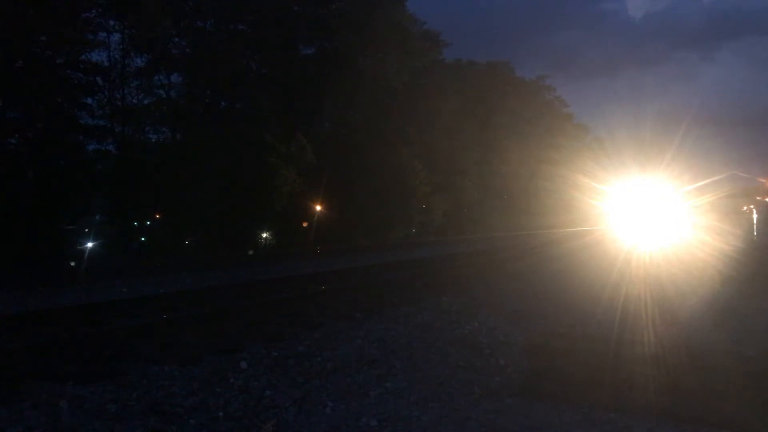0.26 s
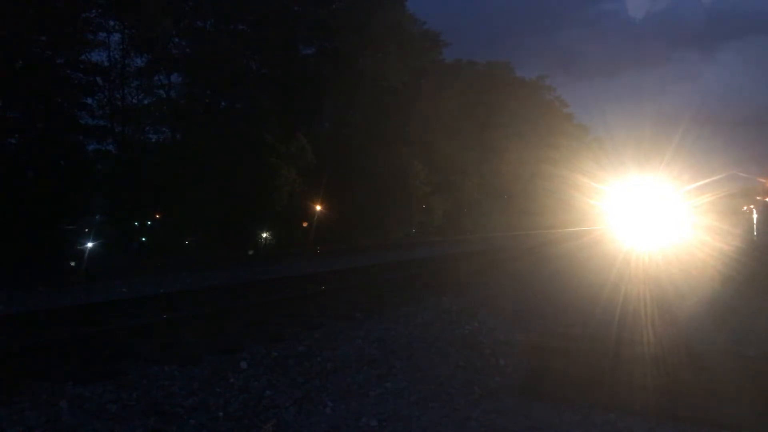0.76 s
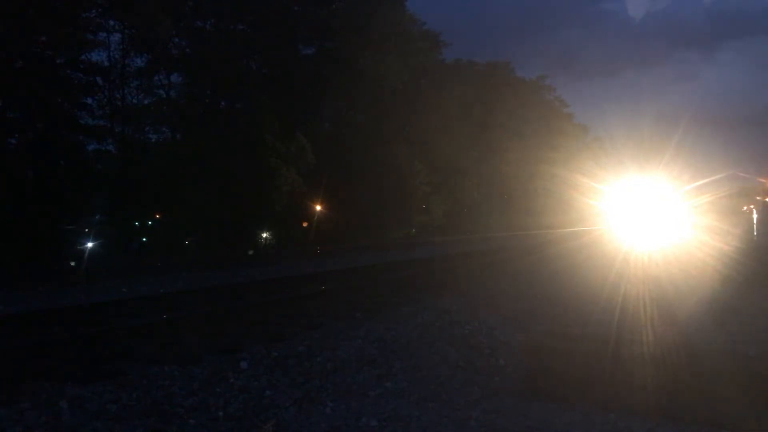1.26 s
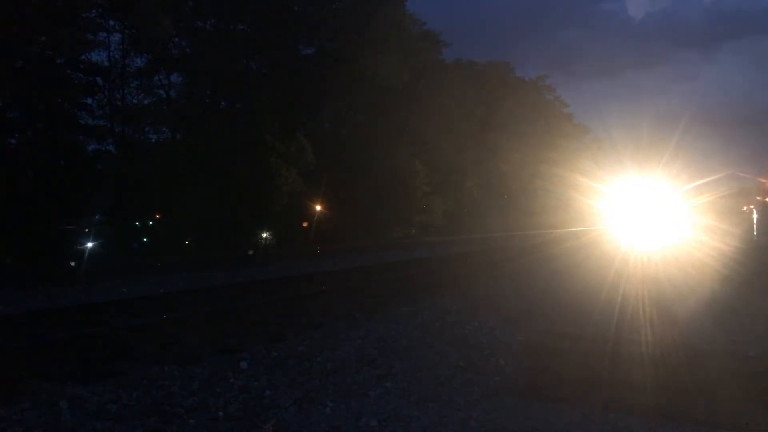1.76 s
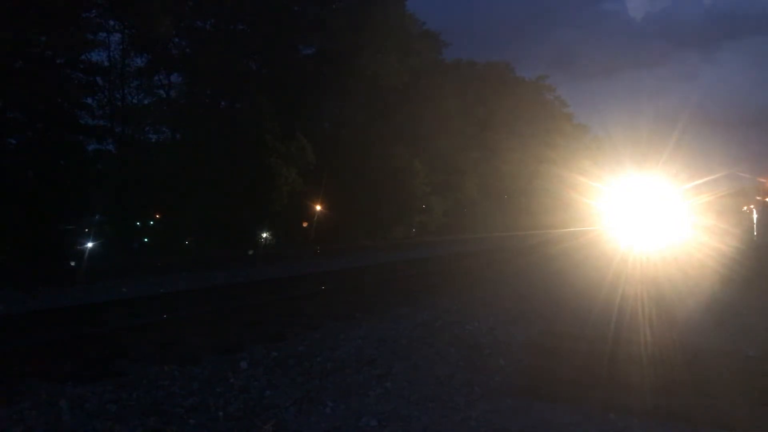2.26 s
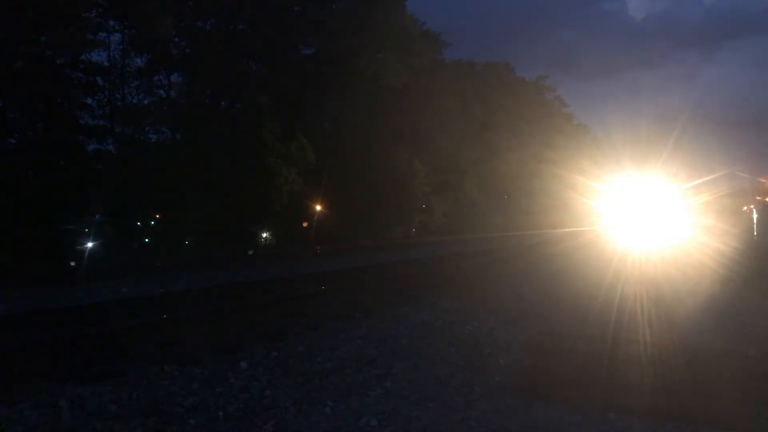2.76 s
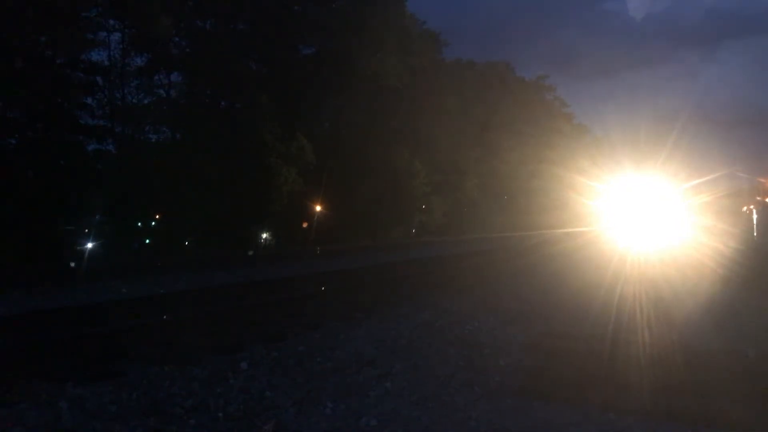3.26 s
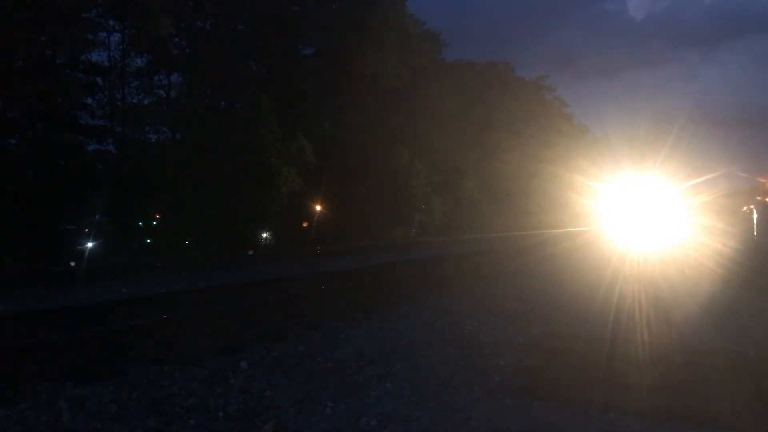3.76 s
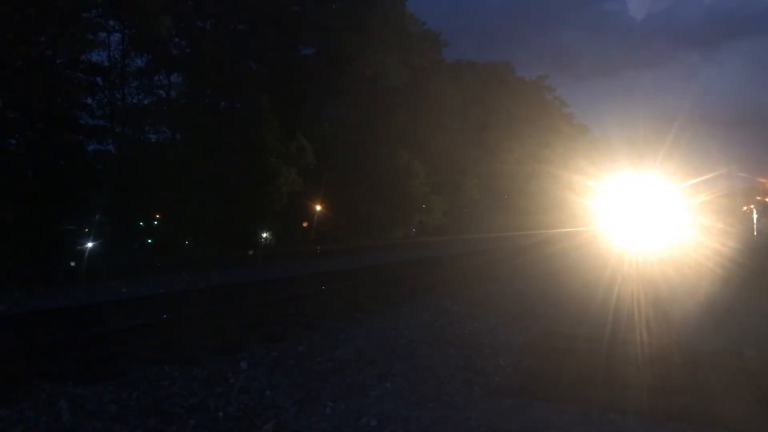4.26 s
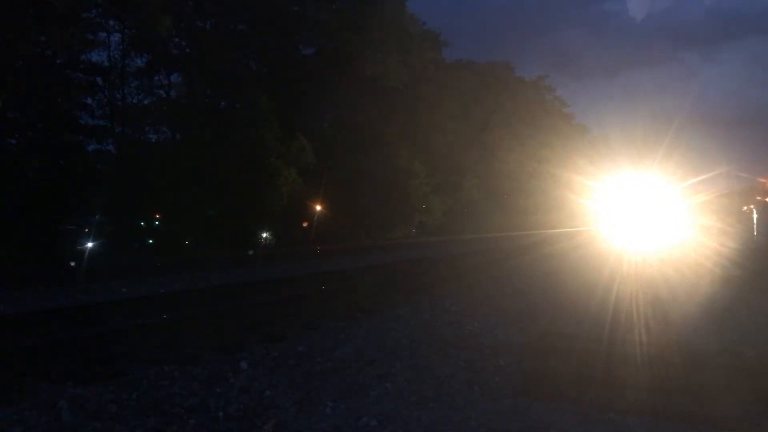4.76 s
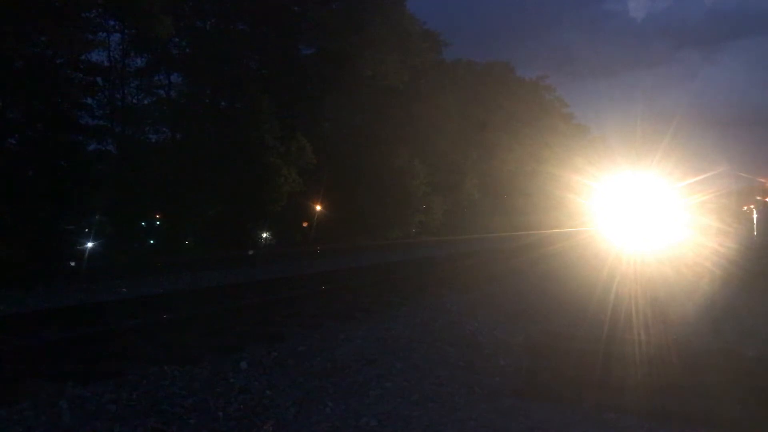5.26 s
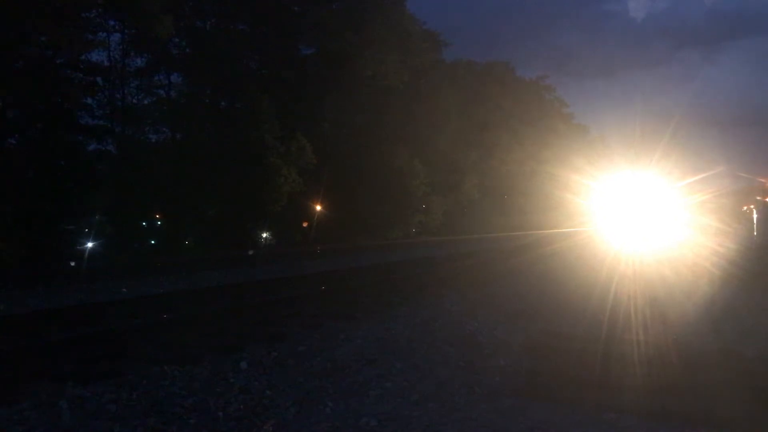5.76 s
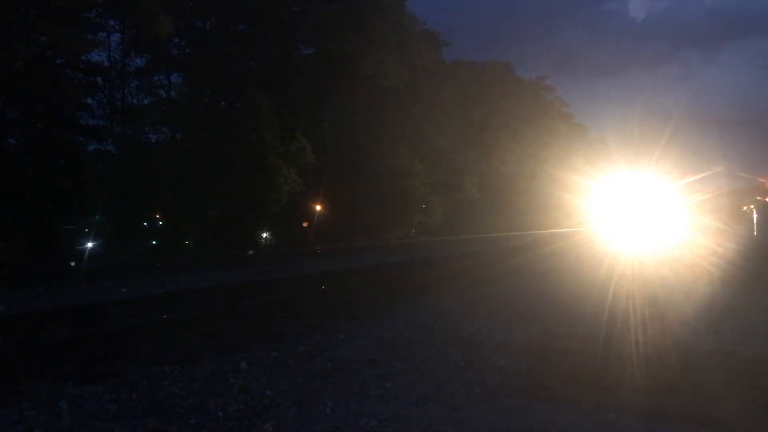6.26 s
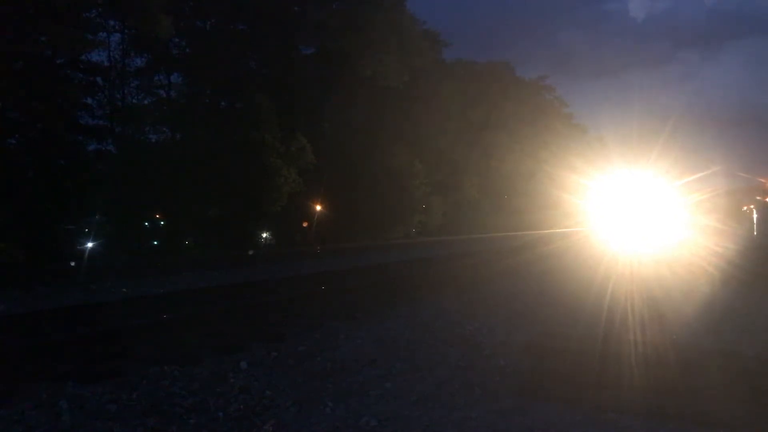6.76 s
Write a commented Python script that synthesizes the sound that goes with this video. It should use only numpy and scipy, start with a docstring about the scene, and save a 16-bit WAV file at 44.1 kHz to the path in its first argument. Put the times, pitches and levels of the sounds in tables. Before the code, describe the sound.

From 0 to 7 seconds a distant diesel locomotive approaches slowly along a line at dusk, its engine holding one low speed. Deep humming tones around 60 and 90 hertz waver over a soft bass rumble, with a smooth, quieter rush of fans and wheels and muted throbbing resonances. A slightly higher engine hum grows very gradually; there is no horn and no passing. Faint insects chirr high in the trees, swelling slightly now and then, most at about 2.4 to 2.9. Close, dull knocks on the microphone mount begin at 2.0, bunch at 2.2 to 2.4 and again at 2.9 to 3.3. A sharp, dry click snaps at 4.2, gravel crunches briefly at 4.6, and a weak tick comes at 5.2. A faint, falling moan swells around 5.3. More thumps land at 5.6, 5.8 and 6.3, with a tiny tick at 6.0. The drone continues to the end.

```python
"""Diesel locomotive at dusk

A locomotive creeps closer from far off, its engine at a steady low speed: tones at multiples of the shaft
speed drone over filtered-noise rumble, fan and wheel rush, hood resonances and two sinking, blurred tones.
Knocks ring the microphone's mount in decaying sines; clicks are filtered snaps, crunches short noise swells.
Insects in the trees are chirping noise bands that swell now and then, under a thin, high buzz."""
import sys
import numpy as np
from scipy import signal
from scipy.fft import rfft, irfft
from scipy.io import wavfile
from scipy.ndimage import uniform_filter1d

SR = 44100
rng = np.random.default_rng(int(sys.argv[2]) if len(sys.argv) > 2 else 0)


def inscribe(sig):
    """Save sig as 16-bit PCM at rate SR to the path in sys.argv[1].

    A 1-D sig is mono; a 2-D sig holds one channel per row.
    Samples are clipped to [-1, 1] before scaling.
    """
    pcm = np.round(np.clip(np.atleast_2d(sig).T, -1, 1) * 32767)
    wavfile.write(sys.argv[1], SR, pcm.astype(np.int16))


N = 308700
T = np.arange(N) / SR


def undb(db):
    """Decibels to gain."""
    return 10 ** (np.asarray(db) / 20)


def level(x, db):
    """Scale to an rms level."""
    return x * undb(db) / np.sqrt(np.mean(x ** 2))


def curves(rows):
    """The columns of a time table, interpolated to one value per sample."""
    s, *columns = np.transpose(rows)
    return [np.interp(T, s, column) for column in columns]


def walk(rate_hz):
    """Smooth random wandering with a spread near 1: twice-averaged random steps."""
    step_n = int(SR / rate_hz)
    steps = np.repeat(rng.standard_normal(N // step_n + 1), step_n)
    smooth = uniform_filter1d(uniform_filter1d(steps, step_n), step_n)
    return 1.47 * smooth[:N]


def shaped(x, points):
    """Filter a sound by (Hz, dB) points, joined on a log frequency axis."""
    hz, db = np.transpose(points)
    bins_hz = np.maximum(np.arange(N // 2 + 1) * SR / N, 1)
    gain = undb(np.interp(np.log(bins_hz), np.log(hz), db))
    return irfft(rfft(x) * gain, N)


def coloured(points):
    """Noise of rms 1 with a spectrum of (Hz, dB) points."""
    return level(shaped(rng.standard_normal(N), points), 0)


def resonate(x, hz, width_hz):
    """A two-pole resonance with gain 1 at its centre."""
    return signal.lfilter(*signal.iirpeak(hz, hz / width_hz, fs=SR), x)


def band(hz, width_hz):
    """Noise of rms 1 through two equal resonances in series, for steep sides."""
    once = resonate(rng.standard_normal(N), hz, width_hz)
    return level(resonate(once, hz, width_hz), 0)


def add(track, s, sound):
    """Mix a sound into a track at a time."""
    start = int(s * SR)
    track[start:start + len(sound)] += sound[:N - start]


def crankshaft(shaft_hz=15.2, wander_share=0.004):
    """Shaft angle in radians: a held speed that wanders by a small share."""
    turns_per_s = shaft_hz * (1 + wander_share * walk(1.978))
    return 2 * np.pi * np.cumsum(turns_per_s) / SR


def exhaust(angle, flutter_db=0.87, fade_db=1.5, fourth_trim_db=-2.0, sixth_trim_db=-0.52, rumble_db=-39.0):
    """Firing pulses give tones at multiples of the shaft speed, over the rumble of turbulent gas."""
    # two main tones fading over the long path: time_s, order4_db, order6_db (both before trim)
    drone_fades = [(0, -33.5, -30), (0.5, -36, -32), (1.05, -39, -38), (1.5, -35, -33.5), (2.2, -41, -36.5),
                   (2.7, -39, -32), (3.2, -35, -38), (3.95, -30.5, -35), (4.7, -34, -36), (5.5, -37, -34),
                   (6.3, -35.5, -40), (7, -37, -32)]
    # weaker tones from unequal cylinders: shaft_multiple, mean_level_db
    weak_orders = [(2, -54), (3, -47), (5, -51), (7, -57), (8, -60.5), (11, -67.5), (12, -59.5)]
    # turbulent exhaust gas, relative spectrum: freq_hz, density_db_per_hz
    gas_spectrum = [(20, -20), (30, -1), (42, 2), (58, 4), (72, 6.5), (88, 5), (104, -1.5), (135, -3),
                    (175, -10), (230, -26.5), (400, -58)]

    def tone(order):
        return np.sqrt(2) * np.sin(order * angle + rng.uniform(0, 2 * np.pi))

    fourth_db, sixth_db = curves(drone_fades)
    # order 9 grows steadily as the locomotive nears: start dB, dB per s
    ninth_db = -53.5 + 1.18 * T
    strongest = [(4, fourth_db + fourth_trim_db), (6, sixth_db + sixth_trim_db), (9, ninth_db)]
    drone = sum(tone(order) * undb(db + flutter_db * walk(7.3)) for order, db in strongest)
    # moving air makes the weak tones come and go
    overtones = sum(tone(round(order)) * undb(db + fade_db * walk(1.62)) for order, db in weak_orders)
    return drone + overtones + level(coloured(gas_spectrum), rumble_db)


def machinery(angle, throb=0.31, rush_db=-47.0, waver_db=0.52, hood_waver_db=1.6):
    """Fans and wheels rush evenly; hood resonances throb at shaft orders 3 and 5."""
    # fans and rolling wheels, relative spectrum: freq_hz, density_db_per_hz
    rush_spectrum = [(250, 0.5), (550, 2), (760, -2), (960, -1.5), (1600, -3), (2400, -9.5), (3400, -15.5),
                     (5200, -21.5), (7000, -28.5), (7900, -35.5), (9200, -40.5), (10400, -38.5),
                     (11500, -36.5), (13400, -41), (15500, -44)]
    # engine hood resonances: centre_hz, width_hz (each of two stages), level_db (before waver and throb)
    hood_modes = [(365.1, 30.5, -58.5), (454, 24, -64.5), (538.5, 70, -59.5), (969, 240, -58.5),
                  (1500, 430, -66.5), (2300, 190, -69.5), (2822, 170, -71.5)]
    rush = level(coloured(rush_spectrum) * undb(waver_db * walk(11)), rush_db)
    hood = sum(band(hz, width_hz) * undb(db + hood_waver_db * walk(3.43)) for hz, width_hz, db in hood_modes)
    beat = 1 + throb * np.cos(3 * angle) + throb * np.cos(5 * angle)
    return rush + hood * beat


def blurred_tone(hz, db, blur_hz):
    """A gliding carrier, its sine and cosine each modulated by noise low-passed at blur_hz."""
    lowpass = signal.butter(2, blur_hz, fs=SR, output="sos")
    blur = signal.sosfilt(lowpass, rng.standard_normal((2, N)))
    angle = 2 * np.pi * np.cumsum(hz) / SR
    return level(blur[0] * np.sin(angle) + blur[1] * np.cos(angle), 0) * undb(db)


def sinking_tones():
    """A faint high whine that grows and a low moan that swells once, both sinking steadily in pitch."""
    whine_hz, whine_db = 7740 - 110 * T, -87 + 1.05 * T
    moan_hz = 703 - 20 * T
    peak_s, swell_s, swell_db = 5.26, 0.98, 9
    moan_db = -64.5 + swell_db * np.exp(-((T - peak_s) / swell_s) ** 2)
    return blurred_tone(whine_hz, whine_db, blur_hz=130) + blurred_tone(moan_hz, moan_db, blur_hz=30)


def knocks(rise_s=0.0041, sway_rise_s=0.012, rattle_db=-36, rattle_s=0.028, rattle_hz=300, rattle_width_hz=220):
    """Pushes ring the mount, duller for long contact, shorter under firm touch; joints rattle, the stand recoils."""
    # knocks: start_s, strength_db, contact_s, stand_sway_db, touch_damping_per_s
    pushes = [(1.98, -8.5, 0.0042, 4, 11), (2.176, -14.5, .0016, -4, 19), (2.196, 1, 0.0062, -10, 6),
              (2.222, -1, 0.0076, 1, 10), (2.4165, -6, 0.0016, 1, 2), (2.9281, 2.5, 0.00066, -11, 15),
              (2.949, -2, 0.0064, 5, 22), (2.983, -3.5, 0.0064, 11, 30), (3.204, -0.5, 0.0015, 6.5, 1),
              (3.2635, -12, 0.0068, 11, 2.4), (5.56, -8.5, 0.0021, 8, 5), (5.781, 0, 0.0041, 2, 42),
              (6.272, 0.5, 0.00048, 2.5, 0.5), (6.2889, -14, 0.0008, -10, 11)]
    # mount ring and slower stand sway, before touch damping: freq_hz, relative_level_db, t60_s
    mount_modes = [(129, -37, 0.25), (166.4, -25, 0.17), (201, -30.5, 0.21), (330.4, -28, 0.31),
                   (414, -16.5, 0.057), (469, -21.5, 0.07), (511, -11, 0.06), (800, -27, 0.049),
                   (1010, -33, 0.038), (1206, -23.5, 0.026)]
    stand_modes = [(42.6, -24, 0.28), (83.2, -23, 0.54)]
    t = T[:SR * 3 // 4]

    def modes(table, build_s):
        ringing = sum(undb(db) * np.exp(-np.log(1000) * t / t60_s) * np.sin(2 * np.pi * hz * t)
                      for hz, db, t60_s in table)
        return ringing * (1 - np.exp(-t / build_s))

    ring, sway = modes(mount_modes, rise_s), modes(stand_modes, sway_rise_s)
    rattle_env = np.exp(-t / rattle_s) * (1 - np.exp(-t / rise_s))
    out, shaking = np.zeros(N), np.zeros(N)
    for s, db, contact_s, stand_db, damping_per_s in pushes:
        push = np.sin(np.pi * np.minimum(t / contact_s, 1)) ** 2
        body = (ring - undb(stand_db) * sway) * np.exp(-damping_per_s * t)
        add(out, s, undb(db) * signal.fftconvolve(body, push / push.sum()))
        # slow pushes shake the joints less
        add(shaking, s, undb(db + rattle_db) * rattle_env / (1 + contact_s / rise_s))
    return out + shaking * band(rattle_hz, rattle_width_hz)


def clicks(scatter_db=-33, scatter_s=0.014, pivot_hz=6000):
    """A one-sample snap or rebound, then decaying noise scattered off the ballast, coloured together."""
    # clicks and rebounds: start_s, strength_db, tilt_db_per_octave
    snaps = [(4.2251, -17, 0), (4.2314, -29, -5), (4.2365, -28, -3), (5.1845, -27, -8), (6.016, -30, -2)]
    # click colour before tilt: freq_hz, gain_db
    snap_spectrum = [(1500, -22), (3400, -1), (4800, 0), (6000, -1.5), (7400, 1), (8600, -14), (12500, -15),
                     (15500, -25)]
    t = T[:SR // 8]
    out = 0
    for s, db, tilt_db in snaps:
        scatter = undb(scatter_db) * np.exp(-t / scatter_s) * rng.standard_normal(len(t))
        force = np.zeros(N)
        add(force, s, (t == 0) + scatter)
        colour = [(hz, snap_db + tilt_db * np.log2(hz / pivot_hz)) for hz, snap_db in snap_spectrum]
        out = out + undb(db) * shaped(force, colour)
    return out


def crunches(width_per_hz=0.44):
    """Ballast stones shift: short Gaussian swells of grating noise."""
    # crunch bands: peak_s, peak_level_db, centre_hz, half_length_s (to 1/e)
    grains = [(4.612, -42.5, 680, .007), (4.614, -47.5, 1500, .015), (4.611, -54, 3300, .007)]
    return sum(band(hz, width_per_hz * hz) * undb(db) * np.exp(-((T - s) / half_length_s) ** 2)
               for s, db, hz, half_length_s in grains)


def swell(start_s, length_s, attack_s=0.091, release_s=0.11):
    """Attack, hold and release of one chorus swell, 0 to 1; the release follows length_s."""
    attack = np.clip((T - start_s) / attack_s, 0, 1)
    release = np.clip(1 - (T - start_s - length_s) / release_s, 0, 1)
    return attack * release


def insects(rest_db=-62.5, chirp_depth=0.26, shrill_hz=11780, shrill_width_hz=600, shrill_db=-81,
            buzz_depth=0.25, buzz_hz=30.1):
    """Many distant insects blur into chirping noise bands; a thin, high buzz lies above them."""
    # chorus voices: centre_hz, width_hz (each of two stages), relative_level_db, mean_chirps_per_s
    voices = [(4330, 750, -6.5, 4.9), (4600, 430, -5, 5.5), (5100, 400, -11, 6), (6100, 360, -15, 4.9)]
    # chorus swells: start_s, length_s, above_rest_db
    chorus_swells = [(.48, 0.33, 3.5), (1.5, 0.33, 1.5), (2.415, 0.5, 5), (3.72, 0.29, 3), (4.48, 0.12, 3),
                     (5.803, 0.41, 3.5), (6.563, 0.46, 2)]
    chorus_db = rest_db + sum(db * swell(s, length_s) for s, length_s, db in chorus_swells)
    chorus = 0
    for hz, width_hz, db, chirps_per_s in voices:
        rate_hz = chirps_per_s * (1 + 0.103 * walk(1.95))
        phase = 2 * np.pi * np.cumsum(rate_hz) / SR + rng.uniform(0, 2 * np.pi)
        chorus = chorus + band(hz, width_hz) * undb(db + chorus_db) * (1 + chirp_depth * np.sin(phase))
    shrill = band(shrill_hz, shrill_width_hz) * (1 + buzz_depth * np.sin(2 * np.pi * buzz_hz * T))
    return chorus + level(shrill, shrill_db)


def scene():
    """The locomotive, the noises near the microphone and the insects, as one channel."""
    angle = crankshaft()
    train = exhaust(angle) + machinery(angle) + sinking_tones()
    nearby = knocks() + clicks() + crunches()
    return (train + nearby + insects())[None]


def record(dry, low_cut_hz=35, top_hz=15700, ease_s=0.004):
    """The recorder cuts the deepest bass and the top, and eases in and out."""
    bass_cut = signal.butter(5, low_cut_hz, "high", fs=SR, output="sos")
    top_cut = signal.ellip(10, 0.2, 80, top_hz, fs=SR, output="sos")
    ease = np.minimum(np.minimum(T, T[::-1]) / ease_s, 1)
    return signal.sosfilt(top_cut, signal.sosfilt(bass_cut, dry) * ease)


dry = scene()
out = record(dry)
inscribe(out)
```